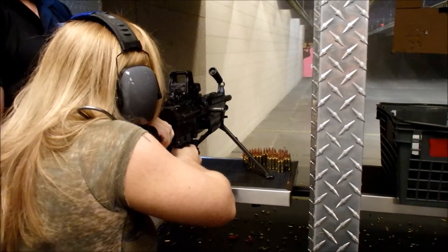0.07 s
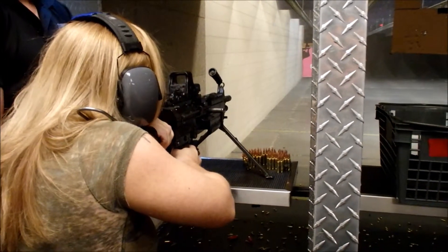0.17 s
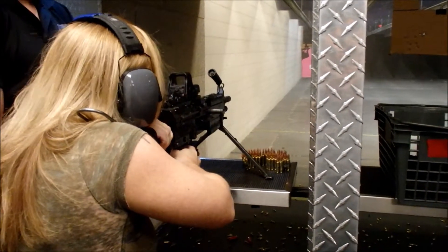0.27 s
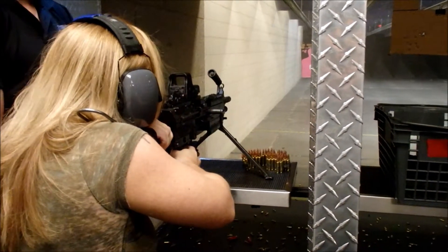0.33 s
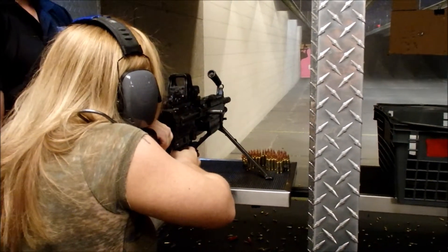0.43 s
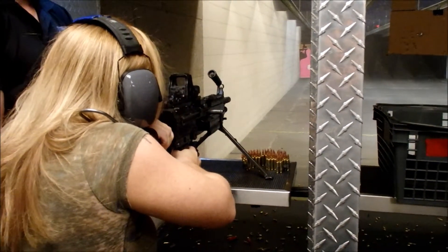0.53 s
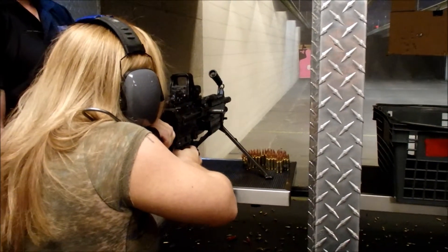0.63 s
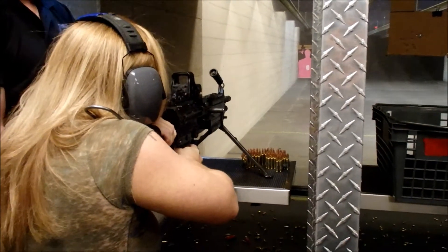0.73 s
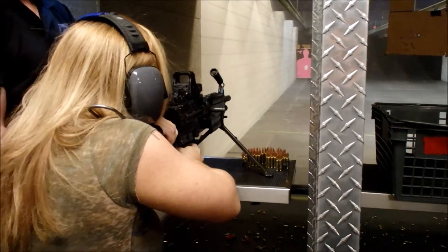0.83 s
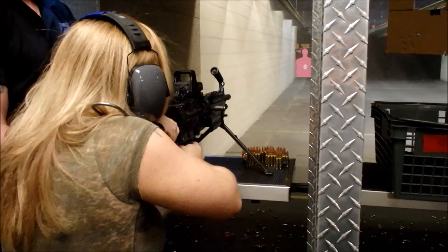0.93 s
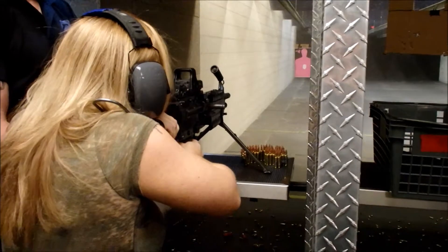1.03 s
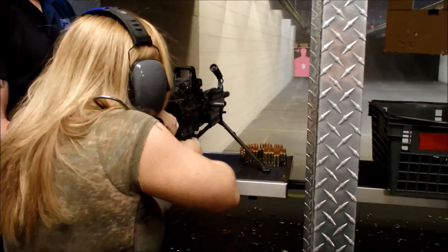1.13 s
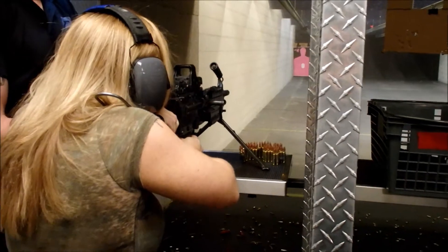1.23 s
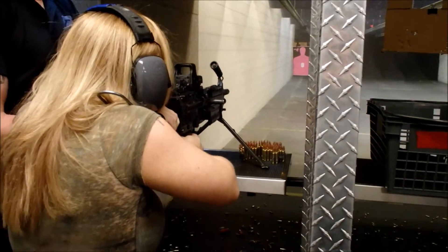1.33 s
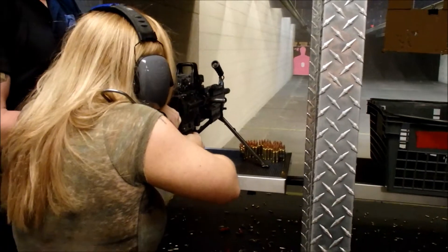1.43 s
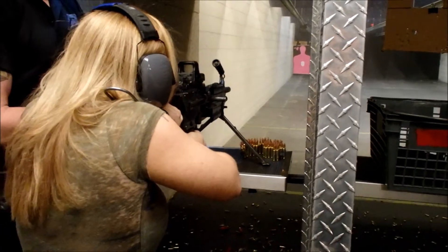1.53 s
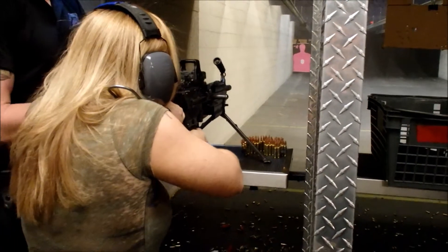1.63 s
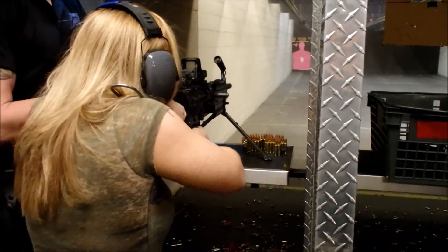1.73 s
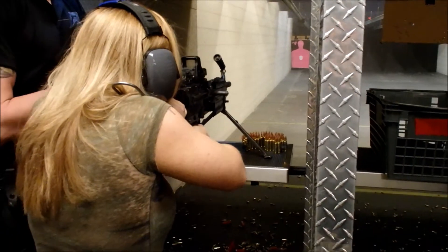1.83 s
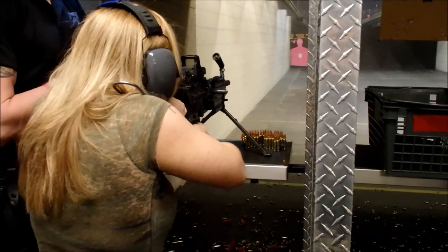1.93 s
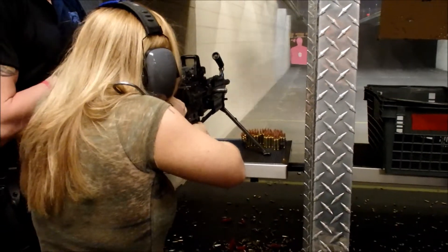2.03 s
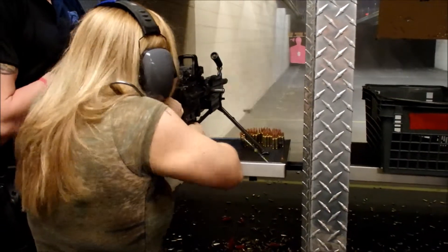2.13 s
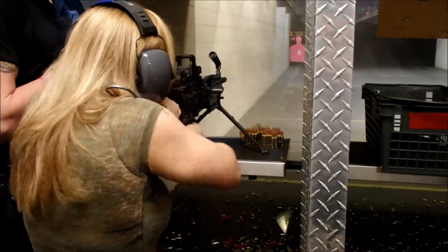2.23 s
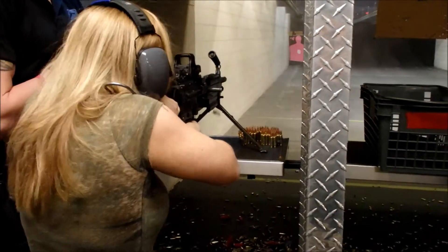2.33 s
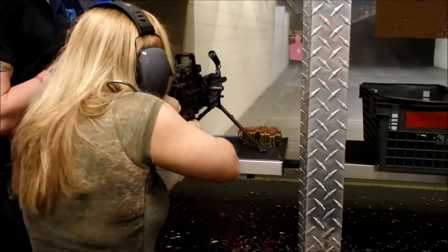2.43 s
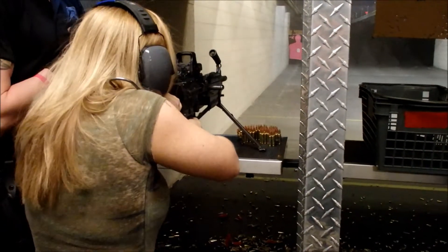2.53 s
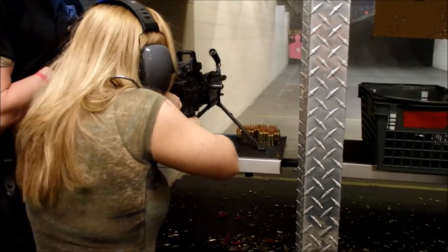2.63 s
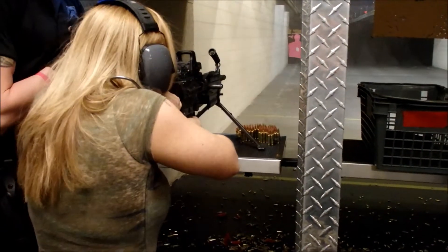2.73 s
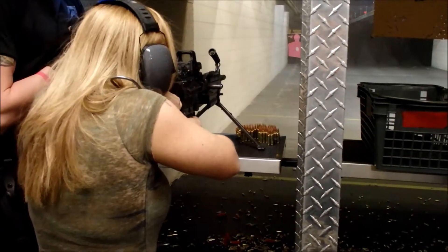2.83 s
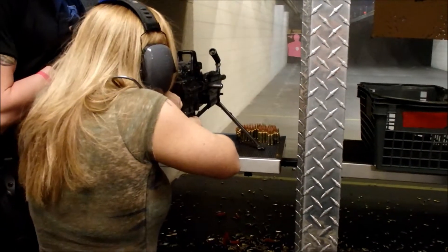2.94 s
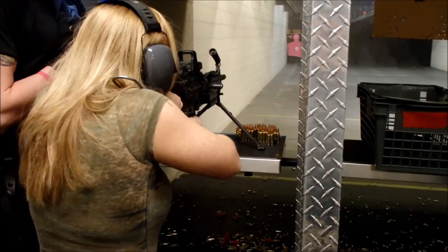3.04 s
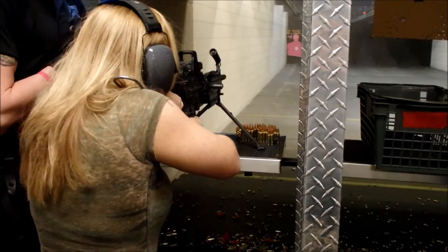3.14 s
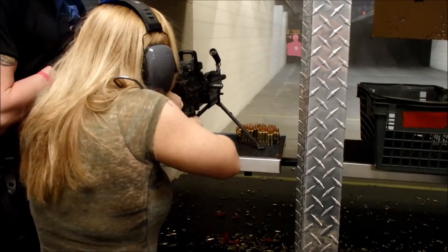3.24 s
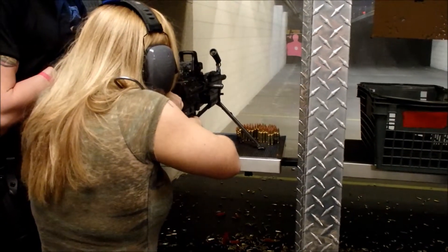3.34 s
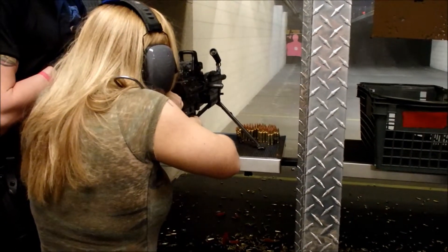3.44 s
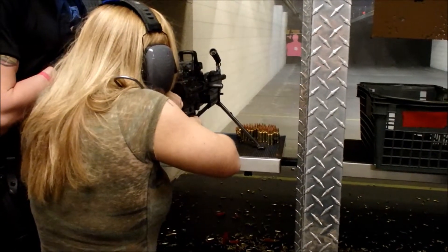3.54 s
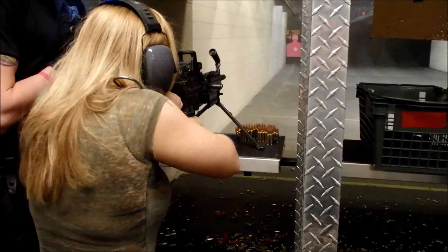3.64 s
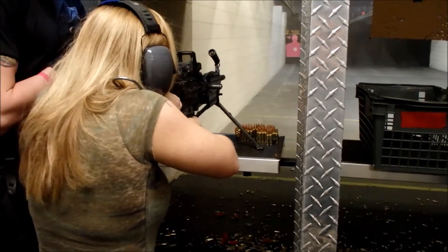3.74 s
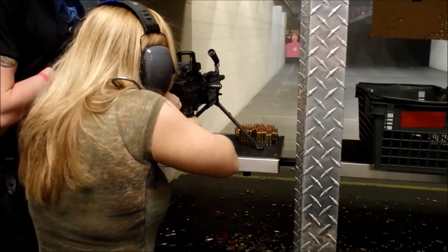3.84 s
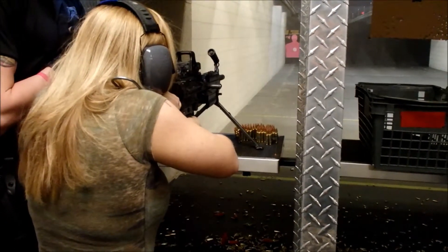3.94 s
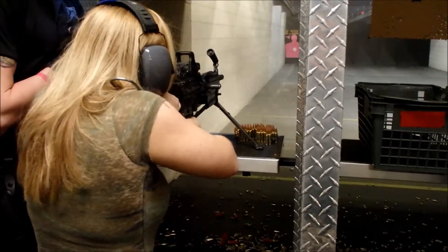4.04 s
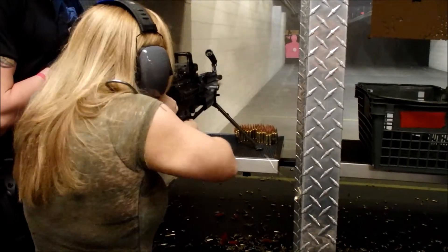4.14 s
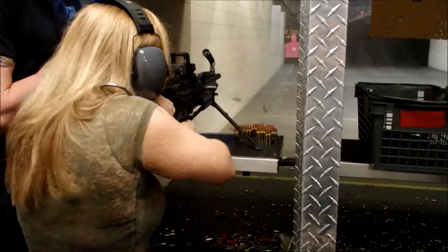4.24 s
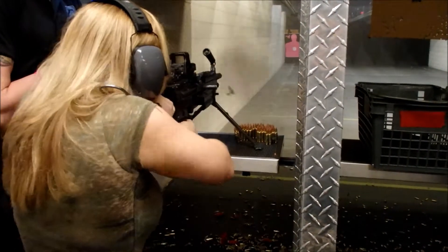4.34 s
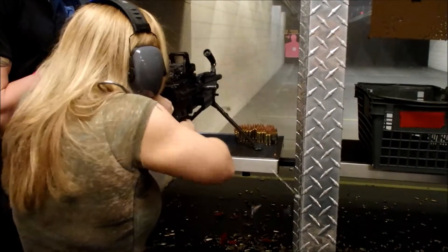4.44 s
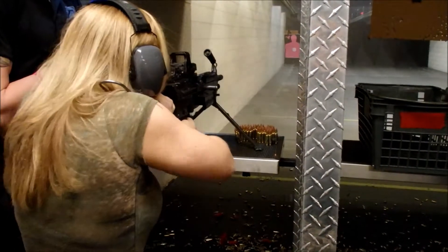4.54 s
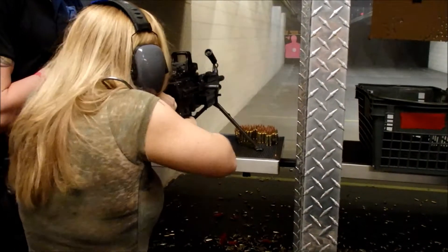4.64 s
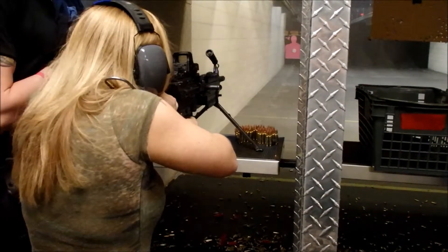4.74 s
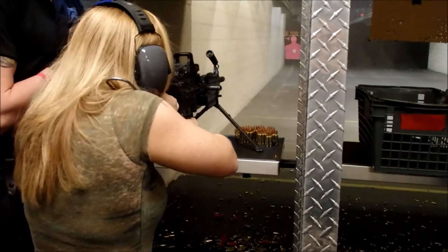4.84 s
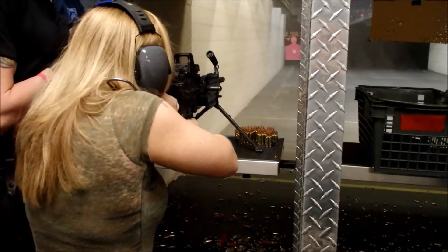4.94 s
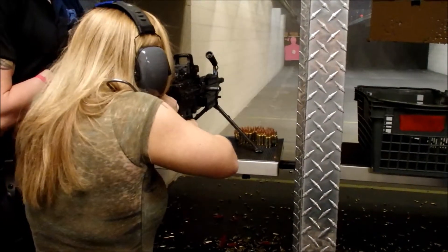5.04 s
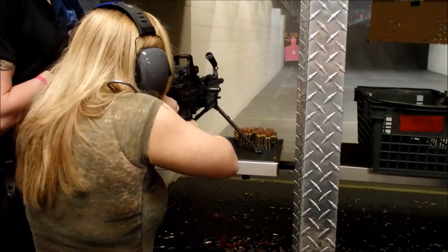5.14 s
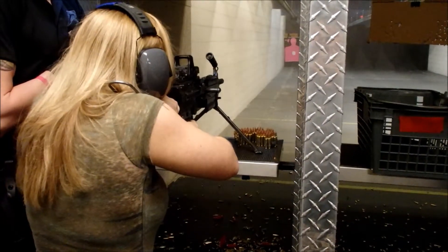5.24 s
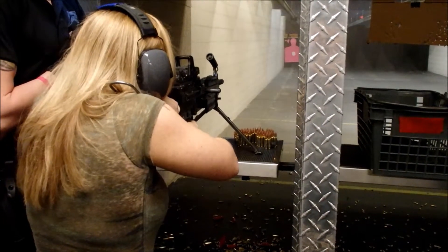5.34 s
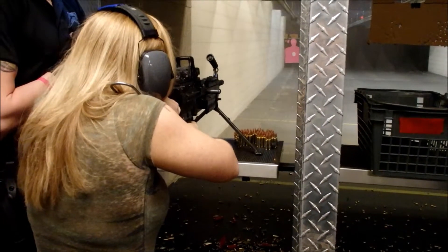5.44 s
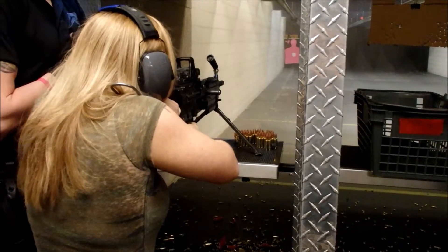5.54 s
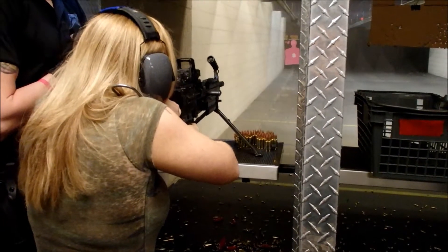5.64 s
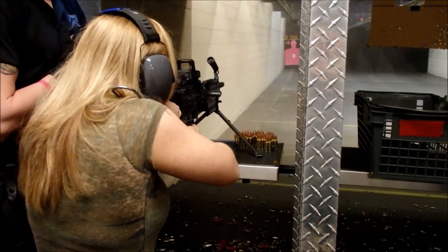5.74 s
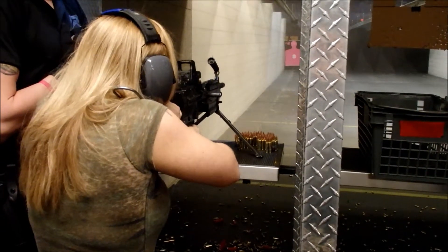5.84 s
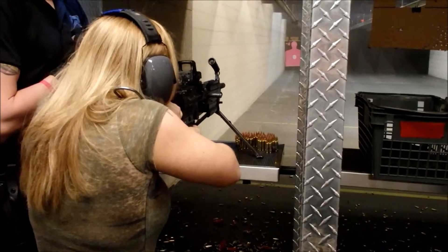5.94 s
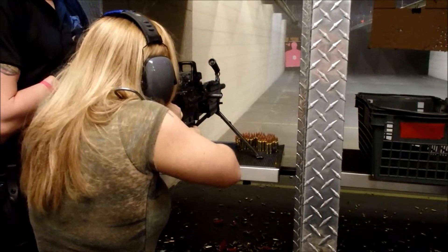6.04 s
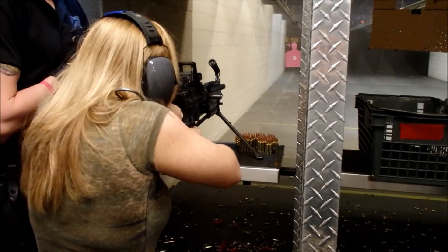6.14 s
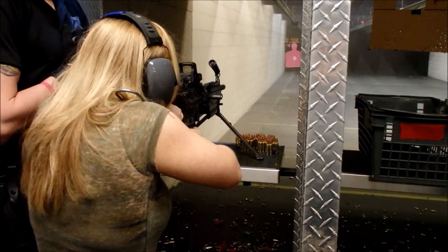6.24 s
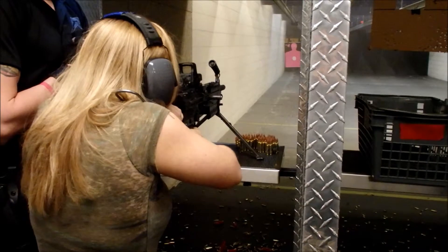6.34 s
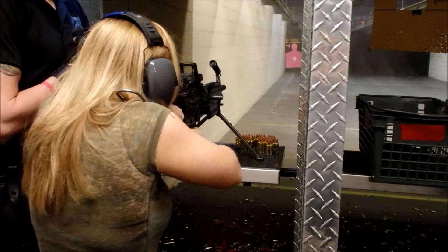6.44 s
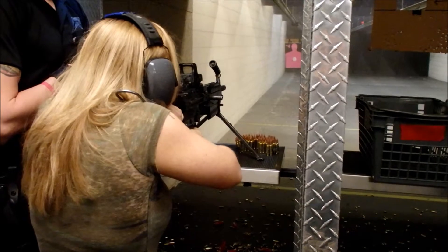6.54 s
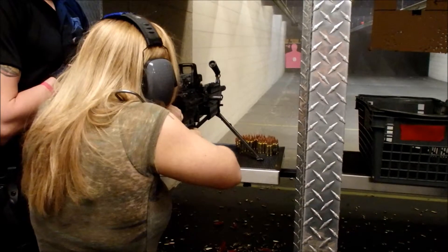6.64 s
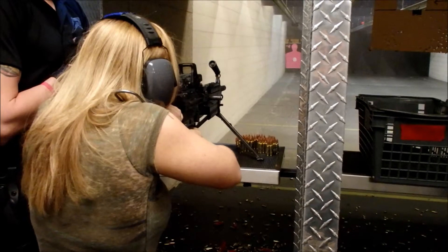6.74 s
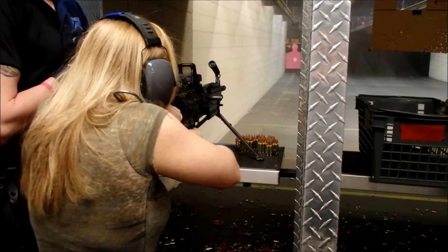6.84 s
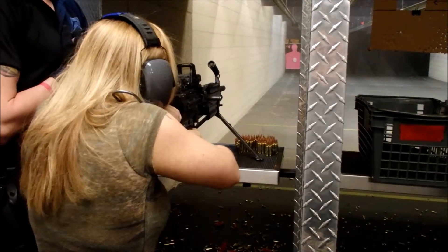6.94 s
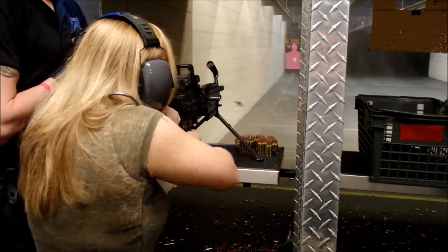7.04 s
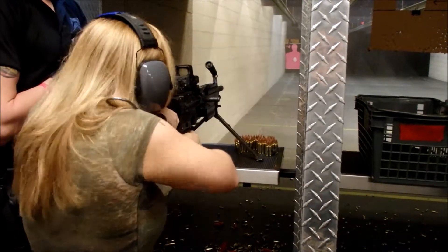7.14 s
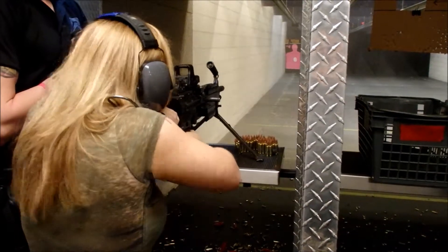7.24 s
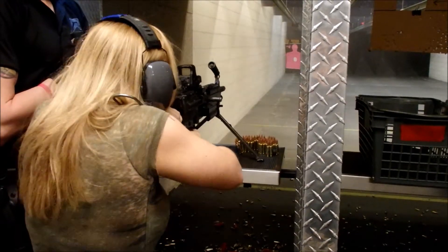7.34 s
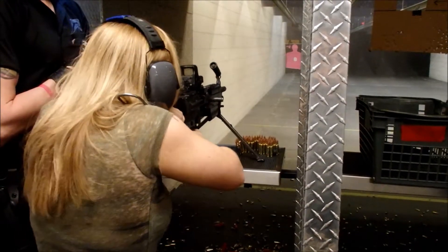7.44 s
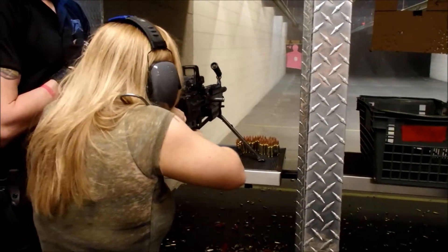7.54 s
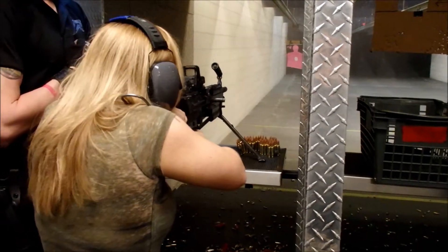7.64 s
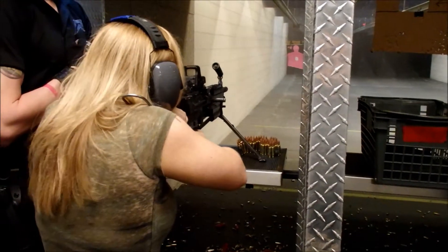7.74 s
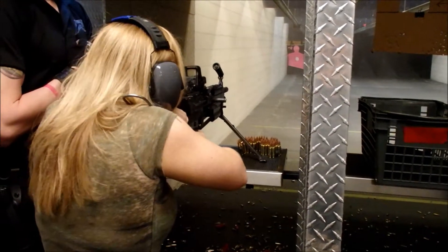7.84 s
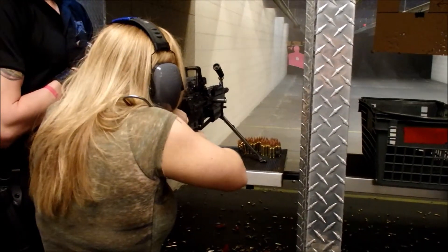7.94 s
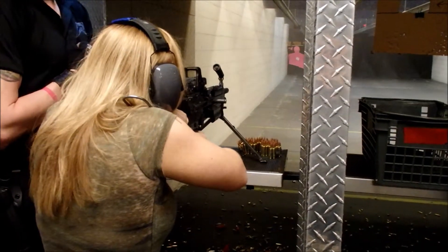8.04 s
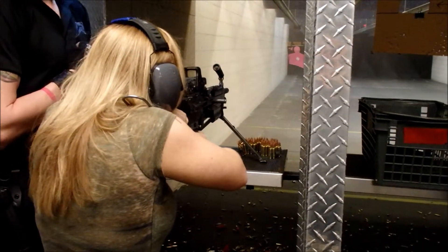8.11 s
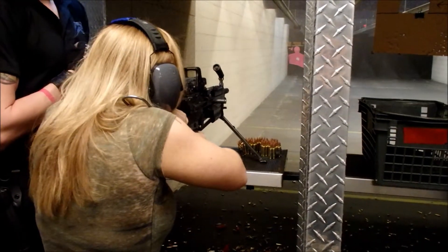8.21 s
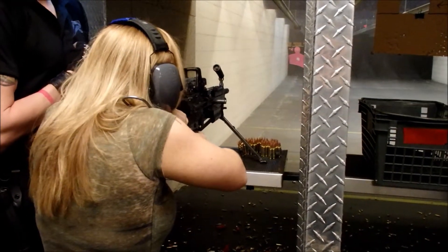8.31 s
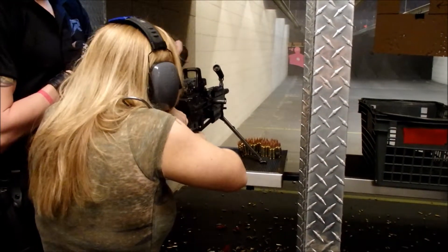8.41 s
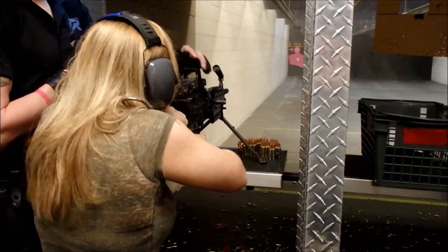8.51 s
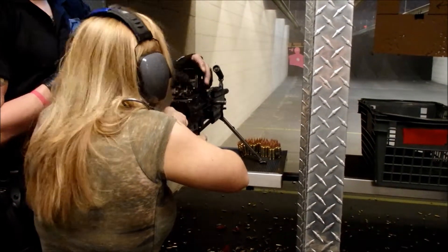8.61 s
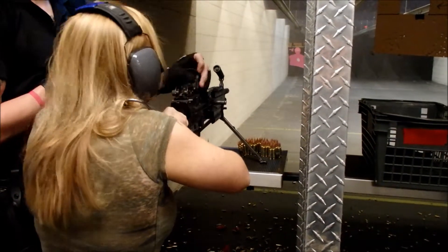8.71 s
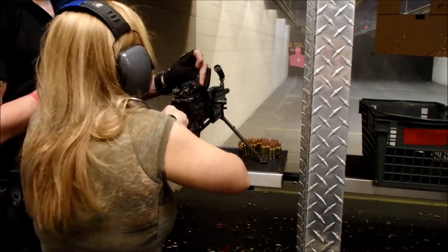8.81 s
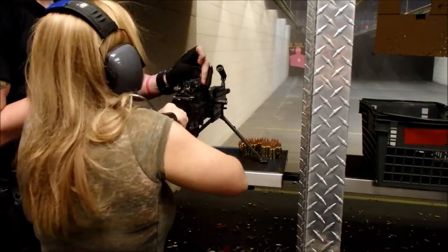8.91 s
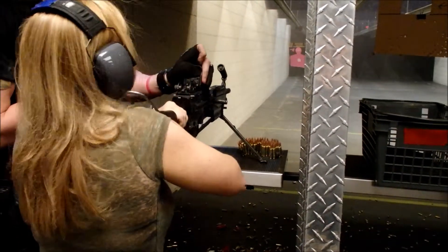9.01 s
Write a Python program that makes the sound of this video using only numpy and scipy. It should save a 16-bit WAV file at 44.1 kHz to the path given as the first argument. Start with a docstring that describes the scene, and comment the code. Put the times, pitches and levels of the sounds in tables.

```python
"""A belt-fed machine gun fires three short bursts in a long, bare indoor range: shock fronts with gas-jet noise.
The bolt rattles forward as shaped clicks; the receiver rings in damped modes, as when the feed cover clanks open.
Steel links tick as bands of noise and brass cases ring; the booth and hall answer with dense random echoes.
The echo of an earlier burst opens the scene; ventilation hums beneath as coloured noise and wavering tones.
A stereo microphone close by limits and clips the loud sounds."""
import sys
import numpy as np
from scipy import signal
from scipy.fft import rfft, irfft, next_fast_len
from scipy.io import wavfile
from scipy.ndimage import uniform_filter1d

SR = 44100
rng = np.random.default_rng(int(sys.argv[2]) if len(sys.argv) > 2 else 0)


def volts_from_db(level):
    """Convert decibel levels to linear amplitude ratios."""
    exponent = np.asarray(level, float) / 20
    return 10 ** exponent


def master(y):
    """Save y as 16-bit WAV."""
    cut = np.clip(np.atleast_2d(y).T, -1, 1)
    pcm = np.round(cut * 32767)  # scale
    wavfile.write(sys.argv[1], SR, pcm.astype(np.int16))


N = 399987  # samples in the scene
LEAD_S = 2  # time computed ahead of the scene, so that the earlier burst can leave its echo
OPPOSITE = np.array([[1], [-1]])  # a side signal enters the two ports in opposite polarity


def clock(s):
    """Uniform sampling: sample times from 0 to s."""
    return np.arange(int(s * SR)) / SR


def colour(x, points):
    """Spectral shaping: a zero-phase filter whose (frequency [Hz], gain [dB]) curve is drawn on a log axis."""
    hz, db = np.transpose(points)
    size = next_fast_len(x.shape[-1])
    log_hz = np.log(np.arange(size // 2 + 1) * SR / size + 1)
    gain = volts_from_db(np.interp(log_hz, np.log(hz), db))
    return irfft(rfft(x, size) * gain, size)[..., :x.shape[-1]]


def level(x, db):
    """Mean power: scale to an rms level."""
    return x * volts_from_db(db) / np.sqrt(np.mean(x ** 2))


def fade(t, t60):
    """Exponential damping: from t = 0 the amplitude falls 60 dB in t60."""
    return (t >= 0) * np.exp(-np.log(1000) * np.maximum(t, 0) / t60)


def ring(t, modes, ratio=1):
    """Modal superposition: a struck body sounds as damped sines, each with a random phase."""
    return sum(volts_from_db(db) * fade(t, t60) * np.sin(2 * np.pi * (hz * ratio * t + rng.random()))
               for hz, db, t60 in modes)


def add(out, x, s):
    """Linear superposition: mix x in from time s."""
    i = int(s * SR)
    out[i:i + len(x)] += x[:len(out) - i]


def echo(x, table, count, size):
    """Diffuse field: random reflections build up and decay by frequency, partly shared by both ports."""
    t = np.arange(count) * size / (2 * SR)
    log_hz = np.log(np.arange(size // 2 + 1) * SR / size + 1)
    hz, *columns = np.transpose(table)
    db, rise, t60, like = (np.interp(log_hz, np.log(hz), c)[:, None] for c in columns)
    shape = volts_from_db(db) * (1 - np.exp(-t / rise)) * fade(t, t60)
    real, imag = rng.standard_normal((2, 2, len(log_hz), count))
    # likeness moves power from the side signal to the mid signal
    balance = np.sqrt(1 + np.multiply.outer([1, -1], np.clip(like, 0, 1)))
    mid, side = (real + 1j * imag) * balance
    spectra = shape * np.array([mid + side, mid - side])
    response = signal.istft(spectra, nperseg=size)[1] / np.sqrt(size)
    return signal.oaconvolve(np.float32(x[None]), np.float32(response), axes=1)[:, :len(x)]


def follow(x, s):
    """Energy averaging: running rms whose power is smoothed with time constant s."""
    keep = np.exp(-1 / (s * SR))
    return np.sqrt(signal.lfilter([1 - keep], [1, -keep], x ** 2))


# ventilation roar spectrum, relative: (frequency [Hz], density [dB per Hz])
VENT_SPECTRUM = [(20, -23), (60, -18), (130, -11), (160, -7), (300, -4), (600, -6), (900, -10), (1800, -22),
                 (3000, -27), (4500, -36), (6500, -50), (15000, -57)]
# fan and motor tones before they waver: (frequency [Hz], nominal level [dB])
FAN_TONES = [(166.9, -41), (220.7, -45), (269.2, -46), (414.5, -48), (586.8, -40), (882.9, -43)]


def ventilation():
    """Turbulence and rotation noise: a broadband roar, less alike at the ports in the treble, and wavering tones."""
    mid, side = rng.standard_normal((2, N))
    apart = colour(side, [(300, -22), (1500, -13), (4000, -5), (8000, -1)]) * OPPOSITE
    roar = level(colour(mid + apart, VENT_SPECTRUM), -35)
    # each tone wanders in pitch and level together
    steps = rng.standard_normal((len(FAN_TONES), N // 2000 + 1))
    drift = uniform_filter1d(np.repeat(steps, 2000, axis=1), size=4000)[:, :N]
    hum = np.zeros(N)
    for (hz, db), wander in zip(FAN_TONES, drift):
        phase = 2 * np.pi * np.cumsum(hz + 4 * wander) / SR
        hum += volts_from_db(db - 2.5 + 3.5 * wander) * np.sqrt(2) * np.sin(phase)
    return roar + hum


# spectrum of the swelling hiss: (frequency [Hz], gain [dB])
HISS_SPECTRUM = [(200, -20), (800, -3), (2000, 1.5), (3000, 2), (4000, -4), (7000, -15), (15000, -16)]


def swelling_hiss(fired):
    """Level modulation: airy noise drops away at every shot and swells steadily in dB until the next."""
    start_db, swell_db_per_s = -87, 14.3
    mid, side = rng.standard_normal((2, N))
    hiss = level(colour(mid + .6 * side * OPPOSITE, HISS_SPECTRUM), 0)
    t = np.arange(N) / SR
    shot_times = np.transpose(fired)[0]
    since_shot = t - shot_times[np.searchsorted(shot_times, t) - 1]
    return hiss * volts_from_db(start_db + swell_db_per_s * since_shot)


# echo of the hall: (frequency [Hz], relative level [dB], build-up time constant [s], t60 [s],
# likeness of the two ports [0-1])
HALL_ECHO = [(60, -42, .5, 4.5, .85), (130, -23, .6, 5, .97), (260, -14, .5, 3.9, .97),
             (400, -13.5, .4, 3.6, .97), (640, -5.5, .36, 3.5, .97), (1100, -9, .2, 3.5, .96),
             (1800, -7, .1, 2.9, .94), (3000, -1.5, .07, 2.15, .8), (5000, 1, .07, 1.1, .4),
             (9000, 2.5, .1, .62, .35), (16000, 3.5, .1, .55, .35)]


def hall(shocks, near):
    """Late reverberation: the long hall answers the shock fronts and the handling sounds."""
    return echo(volts_from_db(-23.5) * shocks + volts_from_db(-48) * near, HALL_ECHO, count=330, size=1024)


# echo of the firing booth: (frequency [Hz], relative level [dB], build-up time constant [s], t60 [s],
# likeness of the two ports [0-1])
BOOTH_ECHO = [(100, -52, .02, .3, .95), (250, -33, .02, .3, .95), (500, -19, .015, .35, .95),
              (1500, -8, .006, .4, .9), (3000, -4.5, .006, .4, .75), (6000, 1, .003, .36, .45),
              (16000, 1, .003, .3, .45)]


def booth(shocks, near):
    """Early reverberation: a small enclosure builds up and decays quickly."""
    return echo(volts_from_db(-16) * shocks + volts_from_db(-34) * near, BOOTH_ECHO, count=330, size=128)


# steel links landing on the bench: (time [s], level [dB], centre frequency [Hz])
LINK_LANDINGS = [(3.376, -18, 8000), (3.7, -48, 10600), (5.453, -12, 8500), (5.692, -31, 7500),
                 (5.896, -26, 8500), (5.913, -24, 4500), (6.05, -37, 8000), (6.334, -37, 9500),
                 (7.894, -34, 8000), (8.625, -38, 6000), (8.65, -40, 5000)]


def links():
    """Damped impact: each steel link ticks as a short band of noise around its centre frequency."""
    out, t = np.zeros(N), clock(.5)
    for s, db, hz in LINK_LANDINGS:
        tick = colour(rng.standard_normal(len(t)), [(.3 * hz, -18), (hz, 0), (1.6 * hz, -18)])
        add(out, volts_from_db(db) * tick * fade(t, .035), s)
    return out


# brass cases landing on the floor: (time [s], mean level [dB], pitch ratio [1])
CASE_LANDINGS = [(3.706, -60, 1.007), (5.552, -61, 1.01), (5.637, -59, 1.001), (5.914, -56, .999),
                 (8.088, -63, 1.001)]
# modes of a case before pitch and level scatter: (frequency [Hz], mean level [dB], t60 [s])
CASE_MODES = [(4560, -1, .45), (6450, -8, .5), (6950, 0, .5), (8700, -2, .5), (11200, -2, .4),
              (12960, -3, .3)]


def cases():
    """Modal ringing: each brass case rings with a randomly uneven level as it tumbles."""
    out, t = np.zeros(N), clock(.5)
    knots = t[::600]
    for s, db, ratio in CASE_LANDINGS:
        tumble = np.interp(t, knots, rng.standard_normal(len(knots)))
        modes = [(hz, mode_db + 3 * rng.standard_normal(), t60) for hz, mode_db, t60 in CASE_MODES]
        add(out, volts_from_db(db + 4 * tumble) * ring(t, modes, ratio), s)
    return out


# blows on the gun body and bench: (time [s], level [dB], t60 [s], treble gain [dB])
BODY_BLOWS = [(3.134, -4, .08, -11), (3.148, -6, .22, -11), (8.806, .5, .09, -12), (8.82, -3.5, .4, -21),
              (8.94, -21, .9, -32), (8.99, -17, .5, -32)]
# modes of the receiver: (frequency [Hz], relative level [dB], longest t60 [s])
RECEIVER_MODES = [(759, 0, 0.14), (1120, -8, 0.26), (1330, -20, 5.0), (1771, -14, 0.6), (2503, -11, 0.31),
                  (2859, -17, 5.0), (3219, -16, 0.52), (4334, -13, 0.18), (8231, -38, 0.91)]


def blows():
    """Impact excitation: a broadband crack, and receiver modes damped at least as fast as the blow allows."""
    out, t = np.zeros(N), clock(.5)
    for s, db, t60, treble_db in BODY_BLOWS:
        curve = [(200, -8), (600, 4), (4500, -4),
                 (6500, treble_db + 2.5), (9000, treble_db), (15000, treble_db - 14)]
        crack = colour(rng.standard_normal(len(t)), curve)
        modes = [(hz, mode_db, min(longest, 1.2 * t60)) for hz, mode_db, longest in RECEIVER_MODES]
        body = ring(t, modes)
        add(out, volts_from_db(db) * (crack * fade(t, t60) + .18 * body), s)
    return out


# the bolt's run before a burst:
# (first shot time [s], pick-up clack level [dB], slide level [dB], breech slam level [dB])
BOLT_TRAVEL = [(2.241, -8, -9, -3), (4.232, -18, -21, -.6), (7.188, -3, -15, -5)]


def bolt():
    """Friction and impact noise: uneven steel clicks creep off the sear, clack on the cartridge, slide and slam."""
    creep_s, pickup_s, slam_s = .051, .0435, .012  # before the first shot
    t = np.arange(N) / SR
    clicks = level(rng.standard_normal(N) * volts_from_db(5 * rng.standard_normal(N)), 0)
    gain = np.zeros(N)
    for s, clack_db, slide_db, slam_db in BOLT_TRAVEL:
        creep = volts_from_db(clack_db - 6)
        clack = volts_from_db(clack_db) * fade(t - s + pickup_s, .04)
        slide = (t >= s - pickup_s) * volts_from_db(slide_db)
        slam = volts_from_db(slam_db) * fade(t - s + slam_s, .09)
        running = (t >= s - creep_s) & (t < s)  # the first shot ends the run
        gain += running * (creep + clack + slide + slam)
    return colour(clicks * gain, [(500, -25), (1800, 0), (4000, 0), (9000, -1.5), (15000, -12)])


# bursts, the first of them before the scene begins: (first shot time [s], rounds [count], blast level [dB])
FIRED_BURSTS = [(-1.85, 3, 22), (2.241, 3, 18), (4.232, 6, 17), (7.188, 2, 18)]


def shots():
    """Quasi-periodic cycling: the time and level of every round, with slightly uneven spacing."""
    cycle_s, scatter_s = .078, .0012
    fired = []
    for s, rounds, db in FIRED_BURSTS:
        for k in range(int(round(rounds))):
            scatter = (k > 0) * scatter_s * rng.standard_normal()
            fired.append((s + k * cycle_s + scatter, db))
    return fired


# slaps from the far end of the range: (delay [s], level relative to the direct shock [dB])
BACKSTOP_SLAPS = [(.098, -6), (.2, -17)]


def blasts(fired):
    """Blast wave and jet noise: a shock front per round, thrown back by the backstop, and a turbulent gas jet."""
    shocks, jets = np.zeros((2, N + LEAD_S * SR))
    t = clock(.1)
    shock = (1 - t / .0006) * np.exp(-t / .0006)  # sudden pressure, then suction
    for s, db in fired:
        jet = rng.standard_normal(len(t)) * fade(t, .09)
        add(jets, volts_from_db(db - 25) * jet, s + LEAD_S)
        add(shocks, volts_from_db(db) * shock, s + LEAD_S)
        for delay, slap_db in BACKSTOP_SLAPS:
            add(shocks, volts_from_db(db + slap_db) * shock, s + delay + LEAD_S)
    return shocks, jets


def scene():
    """Direct and reverberant fields: near sounds and blasts are heard direct, through the booth and the hall."""
    fired = shots()
    background = ventilation() + swelling_hiss(fired)
    near = links() + cases() + blows() + bolt()
    shocks, jets = blasts(fired)
    near_padded = np.concatenate([np.zeros(LEAD_S * SR), near])
    echoes = booth(shocks, near_padded) + hall(shocks, near_padded)
    gun = (echoes + jets + volts_from_db(-24) * shocks)[:, LEAD_S * SR:]
    return gun + near + background


def roll_off(x):
    """The treble ends steeply here."""
    return signal.sosfilt(signal.butter(12, 15540, fs=SR, output="sos"), x)


# response of both microphone ports: (frequency [Hz], gain [dB])
PORT_RESPONSE = [(30, -8), (100, -4), (170, -.5), (300, -1.7), (1000, -2.4), (2100, -1.6), (2350, -4.6),
                 (3000, 2), (3250, -.5), (3500, -8.8), (4000, -5), (4600, -6.8), (5200, -10.6), (9000, -11),
                 (15000, -13.5)]
# left port over right: (frequency [Hz], gain [dB])
LEFT_OVER_RIGHT = [(100, 2.5), (700, 1.8), (2400, 1.5), (4400, 4.5), (8000, 4.5), (15000, 4)]


def record(dry):
    """Transduction and overload: port resonances, an early, louder left port, limiters and two clipping stages."""
    left_lead_s = 3.4e-5
    size = next_fast_len(N)
    # a phase slope in frequency is an advance in time
    advance = np.exp(2j * np.pi * np.arange(size // 2 + 1) * SR / size * left_lead_s)
    left = irfft(rfft(colour(dry[0], LEFT_OVER_RIGHT), size) * advance, size)[:N]
    x = colour(np.array([left, dry[1]]), PORT_RESPONSE)
    envelope = follow(x, .009)
    x = x * np.minimum(1, volts_from_db(-2.6) / np.maximum(envelope, 1e-6)) ** .85  # limiter on each port
    squashed = 2.6 * np.tanh(x / 2.6)
    x = np.clip(squashed, -.67, .71)  # the diaphragm stops a little unevenly
    low_cut = signal.butter(1, 200, "high", fs=SR, output="sos")
    x = volts_from_db(2.8) * signal.sosfilt(low_cut, x)
    x = np.clip(x, -1, 1)  # the input stage's ceiling
    return roll_off(x)


dry = scene()
out = record(dry)
master(out)
```